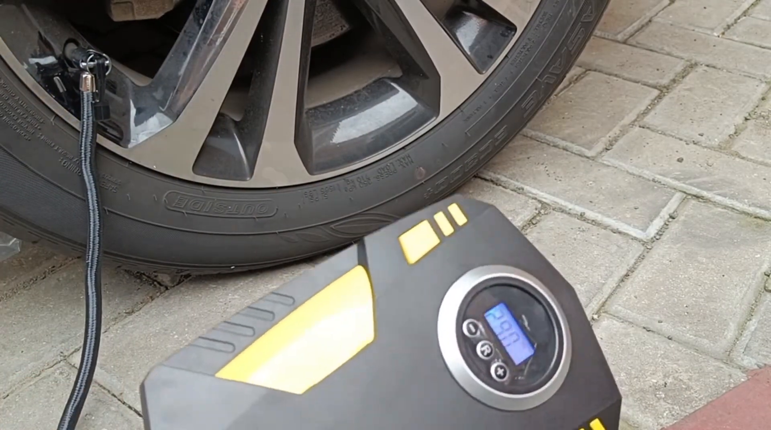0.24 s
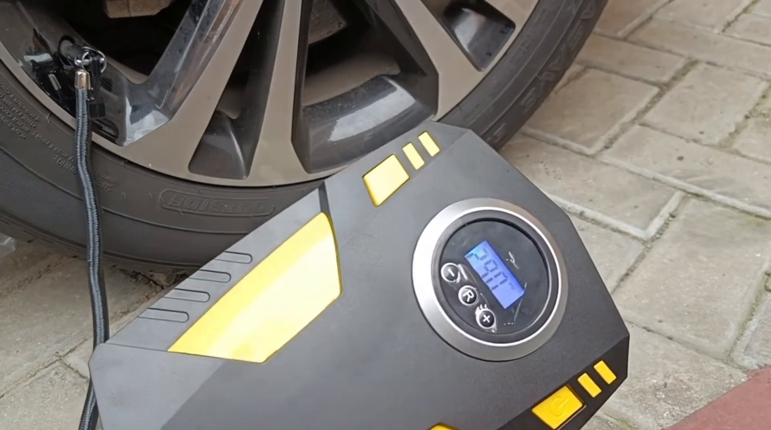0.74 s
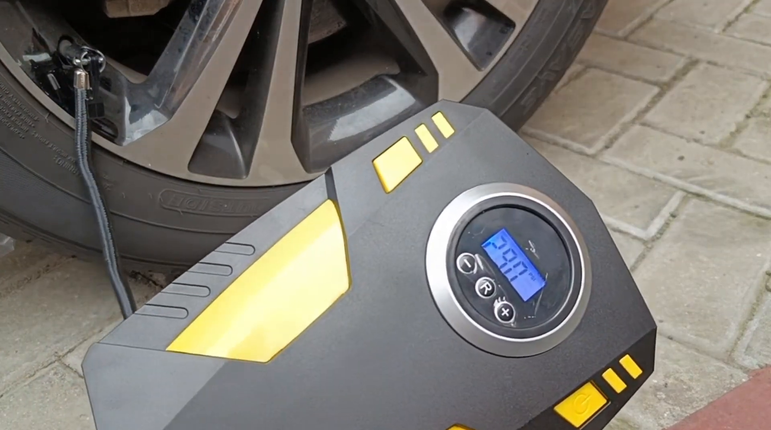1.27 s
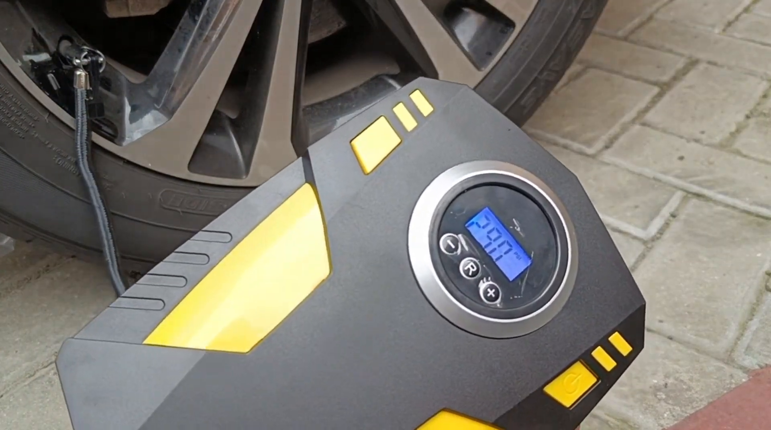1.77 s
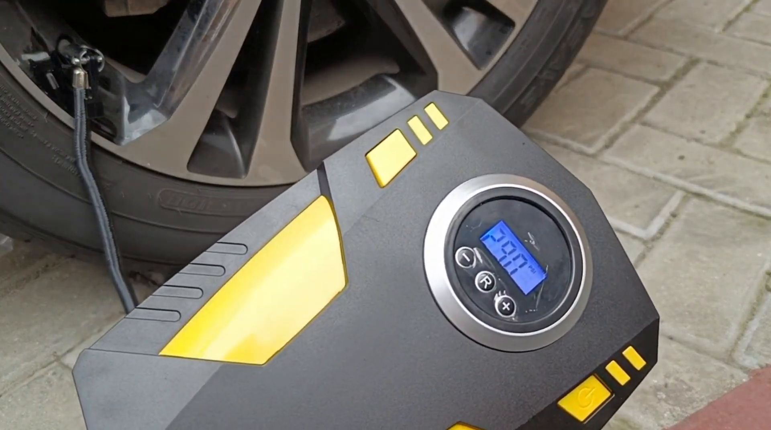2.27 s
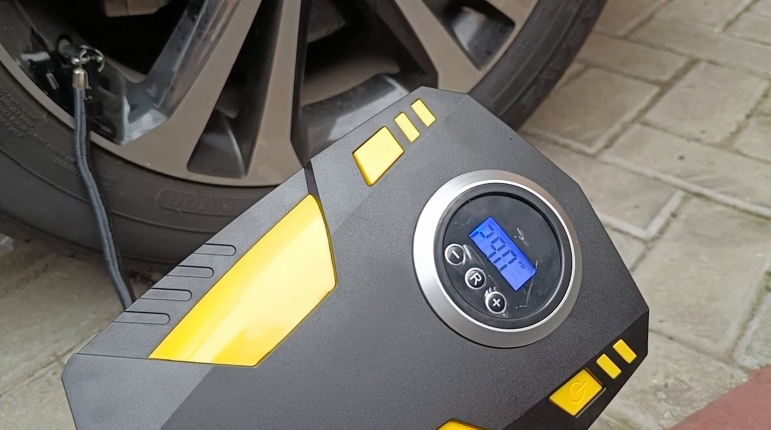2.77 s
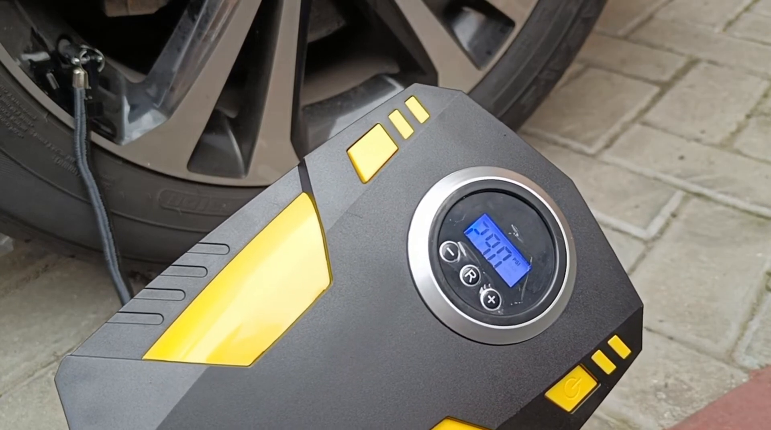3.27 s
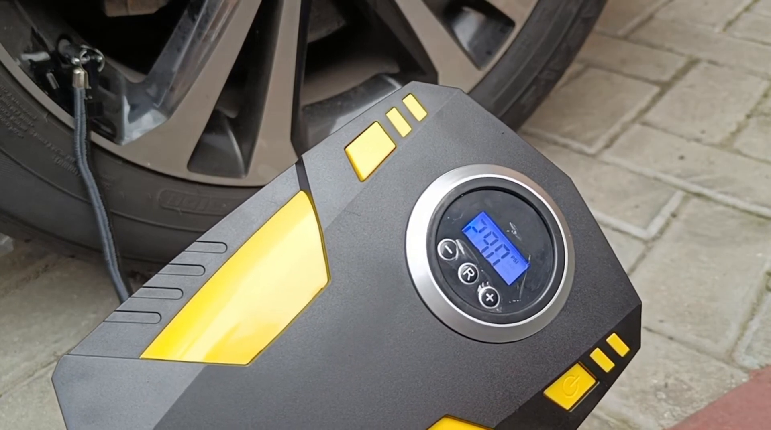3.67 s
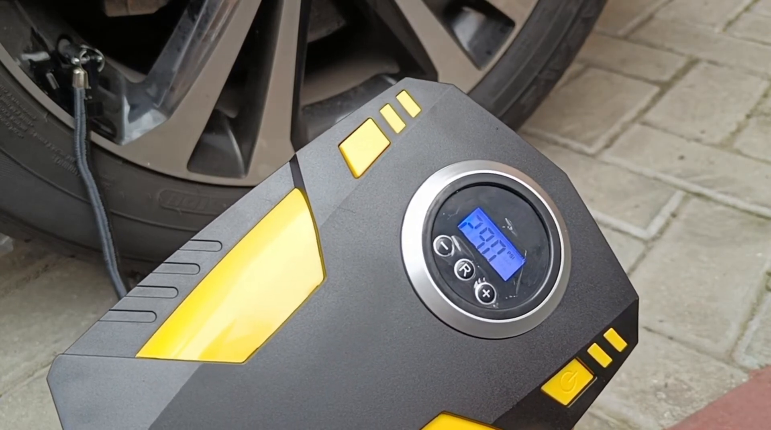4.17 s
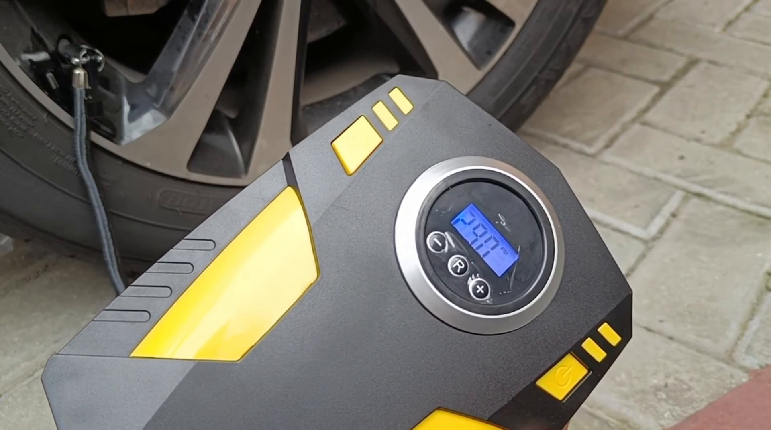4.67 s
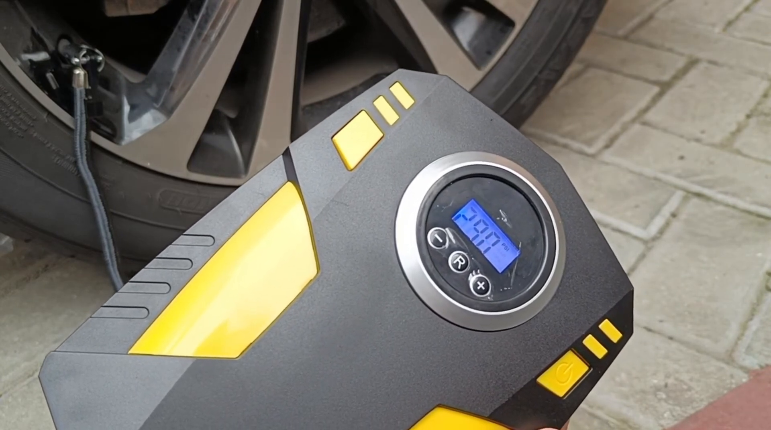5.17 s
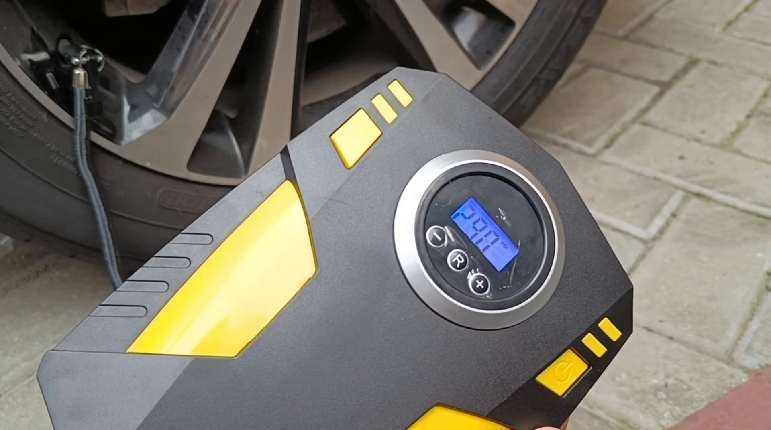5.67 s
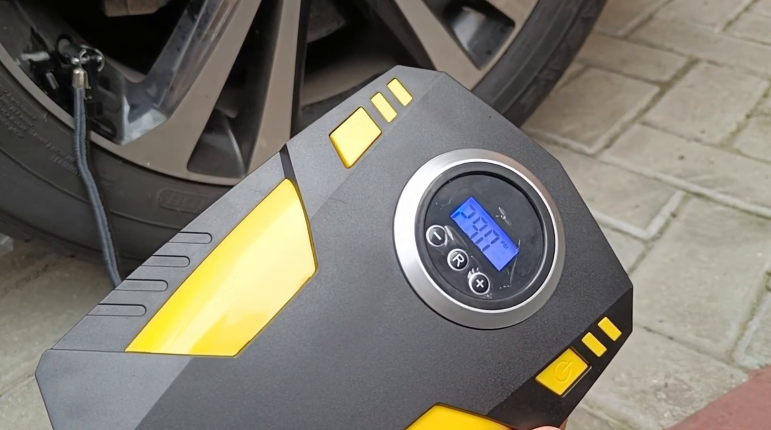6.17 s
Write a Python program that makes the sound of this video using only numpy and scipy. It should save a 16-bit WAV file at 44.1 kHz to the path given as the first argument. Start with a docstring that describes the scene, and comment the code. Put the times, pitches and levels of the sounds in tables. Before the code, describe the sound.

A small portable air compressor runs close to the microphone, pumping air into a car tyre outdoors. Its piston makes a fast, rattling buzz, mixed with gear whine and pulsing hiss. A thin, high whistle joins early and fades. A little before halfway the sound steps down slightly in level, then carries on at the same pace. A faint hum and distant street rumble lie underneath.

```python
"""Beside a car wheel, a hand-held piston air pump runs close to a two-port microphone.
An 11-tooth motor pinion drives a 53-tooth crank wheel, so gear tones and tooth rattle repeat every
11 strokes. With fresh valve hiss and a knocking rod, they pulse at about 47 strokes a second.
The pump is lifted nearer while a valve whistles; at 2.7 s the level steps down and the whistle fades.
Underneath sit the shaking grip, a low hum and a distant street."""
import sys
import numpy as np
from scipy import signal
from scipy.fft import rfft, irfft, next_fast_len
from scipy.io import wavfile
from scipy.ndimage import uniform_filter1d

SR = 44100
rng = np.random.default_rng(int(sys.argv[2]) if len(sys.argv) > 2 else 0)


def wrap_up_sound(samples):
    """Save the sound to the file named by the first command line argument, as 16-bit audio."""
    columns = np.atleast_2d(samples).T
    # keep every value between -1 and 1, then stretch to whole-number steps
    tamed = np.clip(columns, -1, 1)
    steps = np.round(tamed * 32767).astype(np.int16)
    wavfile.write(sys.argv[1], SR, steps)


N = 283563

# Distant street rumble. Each row: frequency in Hz, relative level in dB.
STREET_COLOUR = [(15, -20), (40, -19), (110, -1), (170, -27), (260, -18), (500, -57)]
# Steady low hum. Each row: frequency in Hz, level in dB.
HUM_TONES = [(23.3, -56), (69.9, -54)]
# Shake of the grip. Each row: cycles per stroke, level in dB.
GRIP_SHAKE = [(1, -49), (2, -43), (3, -58)]
# Pace of the crank. Each row: time in seconds, strokes per second.
CRANK_SPEED = [(0.1, 47.259), (0.45, 47.189), (0.75, 47.392), (1.15, 47.413), (1.6, 47.23), (1.95, 47.493),
               (2.3, 47.455), (2.7, 46.946), (2.9, 47.115), (3.5, 47.217), (3.8, 47.316), (4.45, 47.183),
               (4.75, 47.382), (5.2, 47.252), (5.7, 47.361), (6.3, 47.371)]
# Stereo image at the two ports. Each row: frequency in Hz, left over right in dB,
# left lead in radians, likeness from 0 to 1.
STEREO_IMAGE = [(150, 0, .1, .9), (380, 6, .8, .92), (560, -3, .6, .85), (720, -4, .1, .6),
                (760, 3, -1.5, .5), (850, 7, 1.1, .8), (1100, 3, .2, .88), (1270, 1, .4, .65),
                (1420, 2, 2.3, .4), (1550, 4, .3, .35), (2000, -1, .6, .55), (2400, -2, 2.5, .25),
                (2560, -2, .6, .4), (2800, 1.5, 1.9, .4), (4100, -2, 1.6, .5), (5000, -4, 3.8, .4),
                (6000, -11, 3.8, .4), (7000, -13, 4, .1), (8600, 7.5, 4.6, .05), (10400, 18, 3, .05),
                (12500, 3, 3, .05), (15000, -6, 3, .03)]
# Where the tones sit. Each row: frequency in Hz, left over right in dB.
TONE_PAN = [(230, 0), (400, 8), (520, -3), (690, -5), (735, -12), (830, 15), (890, 6), (990, 10), (1050, 4),
            (1180, 0), (1290, -6), (1420, 11), (1520, 11), (2400, -2), (5600, -9)]
# The valve's note. Each row: time in seconds, pitch in Hz, level in dB.
WHISTLE_PATH = [(.25, 4800, -60), (.31, 4830, -42), (.46, 4870, -38), (.56, 4960, -51), (.68, 4960, -40),
                (.9, 4965, -34), (1.299, 4920, -35.5), (1.55, 4930, -47), (2.7, 4900, -50),
                (2.75, 4900, -70)]
# Colour of the rod knock. Each row: frequency in Hz, relative level in dB.
KNOCK_COLOUR = [(1100, -100), (1900, -76.5), (3700, -75.5), (9000, -84.5), (15000, -104)]
# Accent of the knock on each of the 11 strokes, in relative dB.
KNOCK_ACCENTS = np.array([-6, -1, 2, -2, 2, 0, -7.0, -6.0, -3, -5, 1.5])
# Rattle and hiss through the plastic case. Each row: frequency in Hz, relative level in dB.
CASE_COLOUR = [(120, -82), (260, -68.5), (380, -64.5), (460, -69), (560, -56), (660, -66), (980, -44.5),
               (1190, -42), (1370, -53), (2000, -64), (3400, -59), (4000, -63), (5500, -69), (6300, -76.5),
               (7200, -77), (9500, -73.5), (12500, -89.5), (16000, -88)]
# Resonances of the case. Each row: centre in Hz, width in Hz, boost in dB.
CASE_RINGS = [(990, 100, 1), (1185, 80, -14), (2560, 260, 1.5), (3170, 150, 4), (3440, 100, 4),
              (4260, 90, 7), (4700, 100, 5), (4940, 130, 7), (5190, 80, 6), (5645, 230, 14), (7300, 300, 3),
              (8700, 300, 4), (9990, 200, 4), (12400, 700, 4), (15600, 500, 4)]
# The many small modes of the case, one random value every 10 Hz.
CASE_RIPPLE = uniform_filter1d(rng.standard_normal(2000), size=7)
# How each band pulses. Each row: centre in Hz, loudest crank angle in turns, once-a-stroke swing in dB,
# twice-a-stroke swing in dB, beat swing in dB, repeating share of the power from 0 to 1.
STROKE_BANDS = [(330, 1.25, 1, .5, 1.5, .8), (440, 1.12, .5, 1.5, 1.5, .95), (530, 1.05, 1.5, 1, 2.5, .92),
                (690, 1.17, 2, .5, 1, .9), (1000, .86, .6, 2.2, 0, .95), (1400, .88, 1.5, 1.5, .4, .87),
                (2000, .91, 1.8, 1, .3, .6), (2560, .54, 4, .5, .6, .6), (2950, .9, .5, 1.5, .6, .5),
                (3600, .9, .5, 1.5, .6, .5), (4500, .75, 1.5, 1.2, 1.2, .5), (4950, .57, 2.8, .4, .9, .65),
                (5650, .5, 3.6, 0, 4, .6), (6600, .98, 1.5, 1.2, 1.2, .25), (10500, .8, 2, .6, .6, .2)]
# The pinion's high spot meets the stroke twice in 11 turns and beats. Each row: frequency in Hz,
# loudest beat angle in turns, slip from one motor order to the next in turns.
PINION_BEAT = [(228, 1.5, 0), (275, 1.37, 0), (380, .64, 0), (430, .58, 0), (540, .83, 0), (760, .85, 0),
               (880, 1.1, .33), (1150, 1.1, .33), (1300, 1.37, 0), (1500, 1.37, 0), (2300, 1.7, 0),
               (9000, 1.7, 0)]
# Weight of the rattle's 11 families of harmonics, grouped by motor order, in relative dB.
RATTLE_FAMILIES = np.array([-14.0, -48.0, -3.0, -5.0, -19.0, -24.0, -52.0, -52.0, -17.0, -14.0, -8.0])
# Clear tones at motor order x motor speed + crank order x crank speed.
# Each row: motor order, crank order, relative level in dB.
GEAR_TONES = [(-1, 17, -48), (-1, 26, -38), (-1, 27, -43), (-1, 28, -40), (-1, 29, -42), (-1, 59, -43),
              (-1, 35, -42), (0, 4, -51), (0, 6, -41), (0, 7, -48), (0, 8, -47), (0, 9, -44), (0, 10, -50),
              (0, 11, -44), (0, 12, -39.5), (0, 13, -44), (0, 16, -42), (0, 18, -43), (0, 19, -38),
              (0, 20, -41), (0, 21, -35), (0, 22, -35), (0, 23, -42), (0, 24, -44), (0, 25, -54),
              (0, 26, -42), (0, 27, -38), (0, 28, -38), (0, 30, -37), (0, 31, -43), (0, 52, -42),
              (0, 53, -44), (0, 54, -30), (0, 55, -37), (0, 56, -49), (0, 57, -47), (0, 119, -47),
              (1, 0, -48), (1, 1, -46), (1, 3, -44.5), (1, 4, -49), (1, 6, -50), (1, 7, -48), (1, 8, -49),
              (1, 13, -42), (1, 14, -40), (1, 15, -39), (1, 16, -29), (1, 17, -35), (1, 18, -36),
              (1, 19, -42), (1, 25, -37), (1, 26, -44), (1, 27, -40), (1, 49, -46), (1, 114, -48),
              (2, 2, -46), (2, 8, -40), (2, 9, -41), (2, 11, -41), (2, 13, -39), (2, 17, -39),
              (2, 108, -48), (2, 109, -45), (3, -1, -52), (3, 0, -37.5), (3, 1, -45), (4, 1, -42),
              (4, 2, -38), (6, 1, -40)]
# The pump's colour in three states. Each row: frequency in Hz, then gain in dB when held low,
# when lifted near and after the level steps down.
HOLD_COLOURS = [(330, 3.5, 5.5, 0.85), (440, 16.5, 6.5, 1.5), (530, 2, 6, -0.5), (690, 14.5, 9.5, 3),
                (970, 2.5, 6.5, 0.5), (1390, 7, 7.5, 2), (2530, 7.5, 5.5, 1.5), (3900, -7.5, -6, -13.5),
                (4880, 5, 4, -0.5), (5650, -0.5, -0.5, -1.5), (6780, 6.5, 6.5, 0)]
# One band swells or dips for a while. Each row: centre in seconds, half length in seconds, band in Hz,
# change of rattle and hiss in dB, change of the tones in dB.
BAND_SWELLS = [(.45, .6, 2560, 4, -10), (.3, .6, 1000, 1, -3.5), (.2, .5, 5650, -6, -6),
               (5.0, 1.0, 2560, 2, 2), (6.3, .8, 5650, -6.5, -6.5)]

PINION_TEETH, WHEEL_TEETH = 11, 53
CYCLE_SIZE = 4096 * PINION_TEETH  # points in one gear cycle of 11 strokes
LOG_CENTRES = np.log([band[0] for band in STROKE_BANDS])
TIME = np.arange(N) / SR
FFT_SIZE = 2 * next_fast_len(N // 2 + 1)
FFT_HZ = np.fft.rfftfreq(FFT_SIZE, 1 / SR)


def gain_of(db):
    return 10 ** (np.asarray(db) / 20)


def curve(table, hz, column=1):
    """One column of a table, interpolated along log frequency."""
    columns = np.transpose(table)
    return np.interp(np.log(hz + 1), np.log(columns[0] + 1), columns[column])


def drift(top_hz):
    """A smooth random waver of rms 1, spread over the three octaves below top_hz."""
    t = np.arange(0, N + 64, 64) / SR
    waver = sum(np.sin(2 * np.pi * (f * t + rng.random())) for f in np.geomspace(top_hz / 8, top_hz, 24))
    return np.interp(TIME, t, waver / waver.std())


def pan(left_db):
    """Left and right gains that keep the mean power."""
    ratio = gain_of(left_db) ** 2
    return np.sqrt(2 * np.array([ratio, np.ones_like(ratio)]) / (1 + ratio))


def at_ports(left, unshared, hz):
    """A noise spectrum reaches the two ports only partly alike, offset in level and phase."""
    likeness = curve(STEREO_IMAGE, hz, column=3)
    right = likeness * left + np.sqrt(1 - likeness ** 2) * unshared
    right *= np.exp(-1j * curve(STEREO_IMAGE, hz, column=2))
    return np.array([left, right]) * pan(curve(STEREO_IMAGE, hz))


def crank_turns(start_turn=-.023):
    """Crank angle in turns, the running sum of its speed; one turn is one stroke."""
    seconds, speed = np.transpose(CRANK_SPEED)
    return start_turn + np.cumsum(np.interp(TIME, seconds, speed)) / SR


def street_rumble(level_db=-56.5):
    """The distant street: a bed of dark noise, much alike at both ports."""
    white = rng.standard_normal((2, FFT_SIZE))
    spectrum = rfft(white + .68 * white.sum(0)) * gain_of(curve(STREET_COLOUR, FFT_HZ))
    rumble = irfft(spectrum, FFT_SIZE)[:, :N]
    return gain_of(level_db) * rumble / np.std(rumble)


def low_hum():
    """Two steady low sines, dead centre."""
    hum = sum(gain_of(db) * np.cos(2 * np.pi * (hz * TIME + rng.random())) for hz, db in HUM_TONES)
    return np.sqrt(2) * hum


def grip_shake():
    """The grip shakes with the stroke: a throb on the crank's lowest harmonics."""
    angle = 2 * np.pi * (crank_turns() - .3)
    return np.sqrt(2) * sum(gain_of(db) * np.cos(order * angle) for order, db in GRIP_SHAKE)


def level_ride(hz, tonal=False, lift_s=2.1, step_at_s=2.707, step_s=.015, dip_db=-.74, settle_s=1):
    """One band's gain over time: the lift, a step down that dips and settles, and its own swells."""
    low_db, near_db, after_db = (curve(HOLD_COLOURS, hz, column) for column in (1, 2, 3))
    lifted = np.sin(np.pi / 2 * np.minimum(TIME / lift_s, 1))
    stepped = np.clip((TIME - step_at_s) / step_s + .5, 0, 1)
    after_db = after_db + dip_db * np.clip(1 - (TIME - step_at_s) / settle_s, 0, 1)
    db = (1 - stepped) * (low_db + (near_db - low_db) * lifted) + stepped * after_db
    for centre_s, half_s, band_hz, noise_db, tone_db in BAND_SWELLS:
        if abs(np.log(band_hz / hz)) < .06:
            swell = np.cos(np.pi / 2 * np.clip((TIME - centre_s) / half_s, -1, 1)) ** 2
            db += (tone_db if tonal else noise_db) * swell
    return gain_of(db)


def valve_whistle(turns, peak_turn=.68, sharpness=2.3, waver_hz=60, left_db=-7):
    """A valve pipes one short wavering note a stroke while the pump is lifted."""
    seconds, pitch_hz, db = np.transpose(WHISTLE_PATH)
    pitch = np.interp(TIME, seconds, pitch_hz) + waver_hz * drift(150)
    note = np.sin(2 * np.pi * np.cumsum(pitch) / SR)
    puffs = note * np.exp(sharpness * (np.cos(2 * np.pi * (turns - peak_turn)) - 1))
    level = gain_of(np.interp(TIME, seconds, db) + .71 * drift(31.2))
    return pan(left_db)[:, None] * level * puffs / np.std(puffs)


def rod_knock(turns, peak_turn=.885, sharpness=70, return_db=-7):
    """The rod knocks at both ends of the stroke; the teeth in mesh accent the main burst of noise."""
    stroke = np.floor(turns - peak_turn + .5).astype(int)
    scatter_db = .8 * rng.standard_normal(stroke.max() + 3)[stroke + 2]
    accent = gain_of(KNOCK_ACCENTS[stroke % PINION_TEETH] + scatter_db)
    swing = np.cos(2 * np.pi * (turns - peak_turn))
    bursts = accent * np.exp(sharpness * (swing - 1))
    bursts += gain_of(return_db) * np.exp(-sharpness * (swing + 1))  # half a turn later
    left, unshared = rfft(rng.standard_normal((2, N)) * bursts / np.sqrt(np.mean(bursts ** 2)), FFT_SIZE)
    spectrum = at_ports(left, unshared, FFT_HZ) * gain_of(curve(KNOCK_COLOUR, FFT_HZ)) * np.sqrt(SR / 2)
    return level_ride(2000) * irfft(spectrum, FFT_SIZE)[:, :N]


def case_noise(hz, step_hz, turns, power_share, ripple_db=2.2, skew=.75):
    """Stereo bands of noise coloured by the plastic case, each swelling at its own crank angle."""
    size = 2 * (len(hz) - 1)
    draws = rng.standard_normal((len(hz), 4)).T
    left, unshared = draws[::2] + 1j * draws[1::2]
    colour_db = curve(CASE_COLOUR, hz)
    colour_db += sum(db / (1 + (2 * (hz - centre) / width) ** 2) for centre, width, db in CASE_RINGS)
    colour_db += ripple_db * np.interp(hz / 10, range(len(CASE_RIPPLE)), CASE_RIPPLE / CASE_RIPPLE.std())
    spectrum = at_ports(left, unshared, hz) * gain_of(colour_db) * np.sqrt(power_share * step_hz) * size / 2
    bands = []
    for k, (centre, peak_turn, once_db, twice_db, beat_db, _) in enumerate(STROKE_BANDS):
        crossover = np.interp(np.log(hz + 1), LOG_CENTRES, np.arange(len(STROKE_BANDS)) == k)
        noise = irfft(spectrum * crossover, size)[:, :len(turns)]
        angle = 2 * np.pi * (turns - peak_turn)
        if 2300 < centre < 2800 or 4700 < centre < 6000:  # fast attack, slow release
            angle += skew * (np.cos(angle) - 1)
        beat = np.cos(2 * np.pi * (2 * turns / PINION_TEETH - curve(PINION_BEAT, centre)))
        swell = gain_of(once_db * np.cos(angle) + twice_db * np.cos(2 * angle) + beat_db * beat)
        bands.append(noise * swell / np.sqrt(np.mean(swell ** 2)))
    return np.array(bands)


def valve_hiss(turns, gain_db=3):
    """Air through the valves, band by band: it pulses with the stroke and never repeats."""
    fresh_share = 1 - curve(STROKE_BANDS, FFT_HZ, column=5)
    return gain_of(gain_db) * case_noise(FFT_HZ, SR / FFT_SIZE, turns, fresh_share)


def tooth_rattle(hz, step_hz, cycle_turns, tone_spectrum, gain_db=-5.5):
    """One gear cycle of chattering teeth, band by band, on the harmonics the clear tones leave free."""
    family_power = gain_of(RATTLE_FAMILIES) ** 2
    family = (5 * np.arange(len(hz)) + 2) % PINION_TEETH  # groups the harmonics by motor order
    share = (family_power / family_power.mean())[family] * curve(STROKE_BANDS, hz, column=5)
    rattle = case_noise(hz, step_hz, cycle_turns, share)
    return gain_of(gain_db) * irfft(rfft(rattle) * (tone_spectrum == 0), CYCLE_SIZE)


def gear_tones(hz, scatter_turns=.04, ring_hz=2555, ring_width_hz=50):
    """Spectrum of the gear and piston tones; neighbours peak together where their band is loudest."""
    motor, crank, db = np.transpose(GEAR_TONES)
    harmonic = np.round(WHEEL_TEETH * motor + PINION_TEETH * crank).astype(int)
    tone_hz = hz[harmonic]
    stroke_delay = np.cumsum(curve(STROKE_BANDS, hz))[harmonic] / PINION_TEETH
    beat_shift = motor * (curve(PINION_BEAT, tone_hz) - 2 * curve(STROKE_BANDS, tone_hz) / PINION_TEETH)
    beat_shift -= curve(PINION_BEAT, tone_hz, column=2) * motor * (motor - 1) / 2
    phase = 2 * np.pi * (beat_shift - stroke_delay + scatter_turns * rng.standard_normal(len(db)))
    phase -= np.arctan(2 * (tone_hz - ring_hz) / ring_width_hz)  # the case ring lags the blow
    port_phases = np.array([phase, phase - curve(STEREO_IMAGE, tone_hz, column=2)])
    spectrum = np.zeros((2, len(hz)), complex)
    spectrum[:, harmonic] = gain_of(db) * pan(curve(TONE_PAN, tone_hz)) * np.exp(1j * port_phases)
    return spectrum * CYCLE_SIZE / np.sqrt(2)


def gear_train(turns, tone_gain_db=-1.87):
    """Rattle and tones loop every 11 strokes, locked to the crank. Yields the pair for each band."""
    cycle_turns = np.arange(CYCLE_SIZE) * PINION_TEETH / CYCLE_SIZE
    step_hz = np.mean(np.transpose(CRANK_SPEED)[1]) / PINION_TEETH
    hz = np.arange(CYCLE_SIZE // 2 + 1) * step_hz
    nearest_band = np.round(np.interp(np.log(hz + 1), LOG_CENTRES, np.arange(len(STROKE_BANDS))))
    spectrum = gear_tones(hz)

    def looped(cycle):
        return np.array([np.interp(turns, cycle_turns, side, period=PINION_TEETH) for side in cycle])

    for k, rattle in enumerate(tooth_rattle(hz, step_hz, cycle_turns, spectrum)):
        tones = gain_of(tone_gain_db) * irfft(spectrum * (nearest_band == k), CYCLE_SIZE)
        yield looped(rattle), looped(tones)


def air_pump(wobble_turns=.0015, wobble_hz=6):
    """One crank, running a touch early or late, drives valves, rod and gears."""
    turns = crank_turns() + wobble_turns * drift(wobble_hz)
    mix = valve_whistle(turns) + rod_knock(turns)
    for (hz, *_), (rattle, tones), hiss in zip(STROKE_BANDS, gear_train(turns), valve_hiss(turns)):
        mix += level_ride(hz) * (rattle + hiss) + level_ride(hz, tonal=True) * tones
    return mix


def scene():
    """The pump up front, over a low bed of shake, hum and street."""
    return air_pump() + grip_shake() + low_hum() + street_rumble()


def record(dry):
    """A soft clip rounds off the loudest strokes, then a low-pass trims the very top."""
    ceiling, cutoff_hz = 1.05, 15950
    soft = dry / (1 + (abs(dry) / ceiling) ** 3) ** (1 / 3)
    low_pass = signal.firwin(511, cutoff_hz, window=("kaiser", 9), fs=SR)
    return signal.oaconvolve(soft, low_pass[None], "same")


dry = scene()
out = record(dry)
wrap_up_sound(out)
```